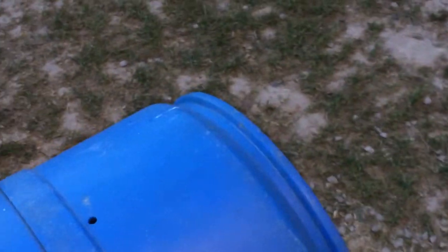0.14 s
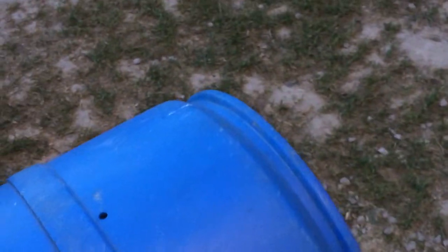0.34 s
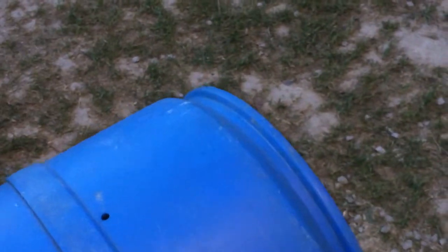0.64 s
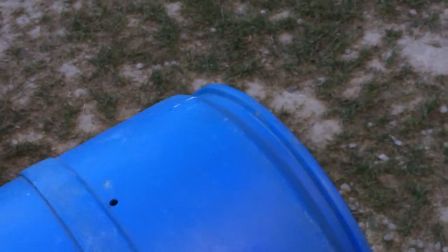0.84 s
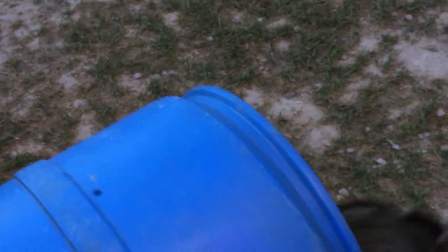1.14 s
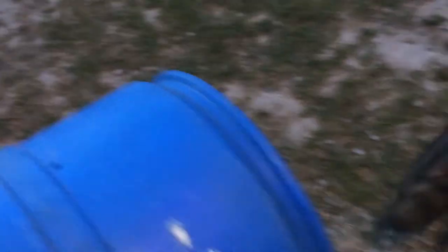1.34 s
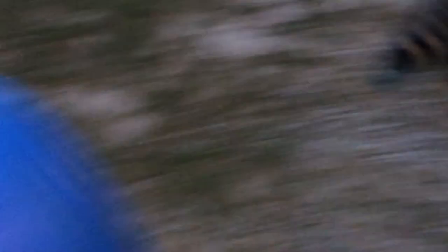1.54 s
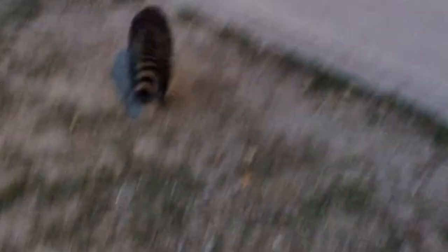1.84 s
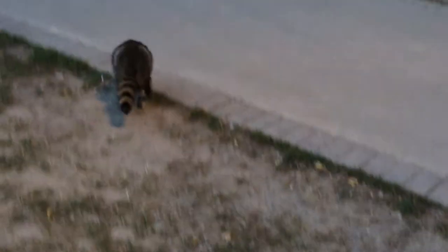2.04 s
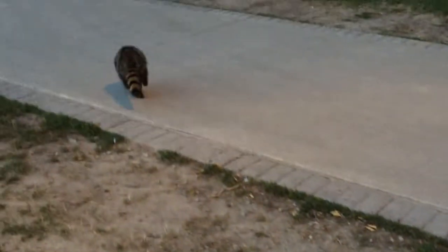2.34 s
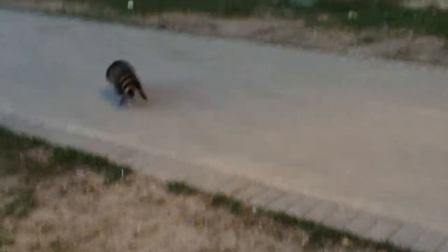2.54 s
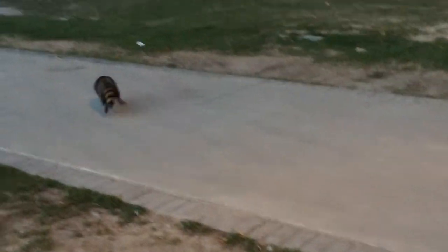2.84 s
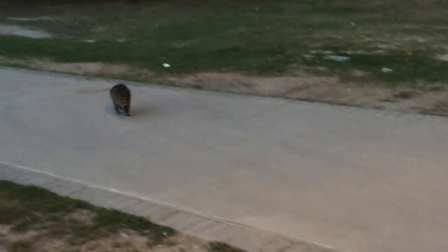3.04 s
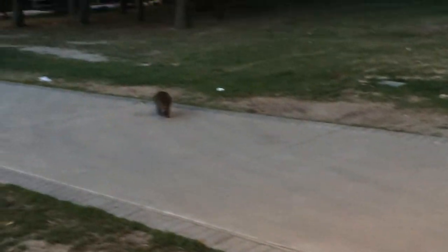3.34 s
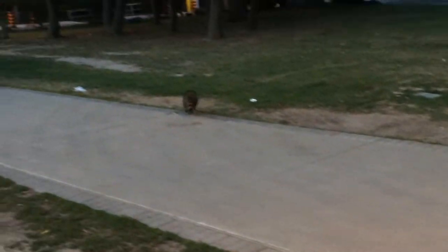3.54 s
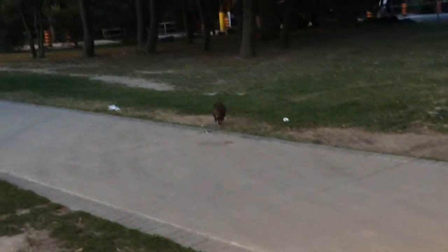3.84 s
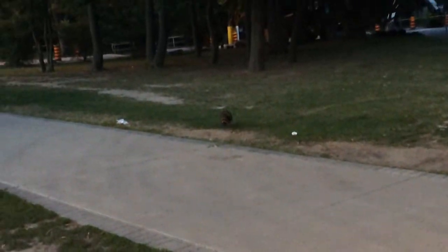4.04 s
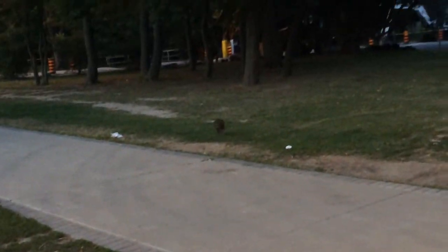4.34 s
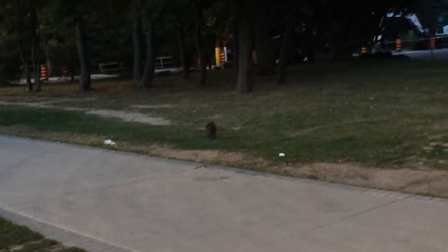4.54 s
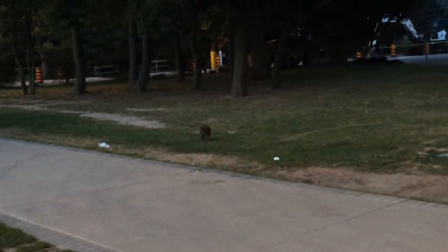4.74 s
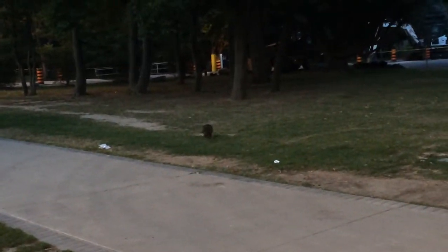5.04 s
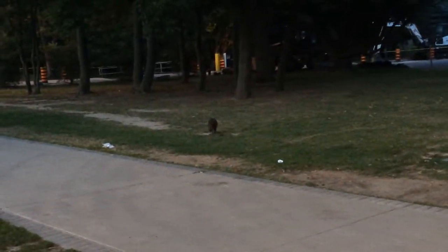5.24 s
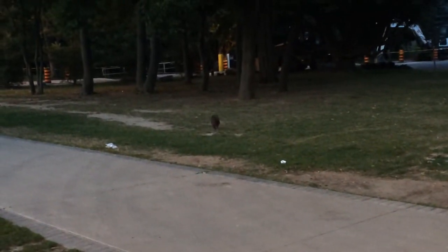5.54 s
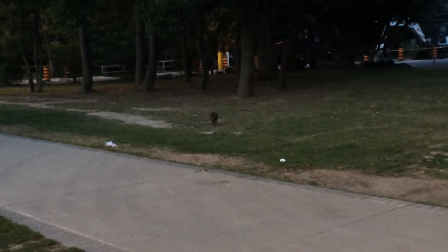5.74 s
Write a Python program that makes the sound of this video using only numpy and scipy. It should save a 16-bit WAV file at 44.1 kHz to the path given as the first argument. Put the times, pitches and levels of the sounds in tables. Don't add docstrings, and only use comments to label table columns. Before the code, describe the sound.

A boot thuds three times against an empty plastic drum; it rocks and scrapes dirt, claws scrabble out, and quiet traffic rumble remains.

```python
import sys
import numpy as np
from scipy import signal
from scipy.fft import rfft, irfft
from scipy.io import wavfile
from scipy.ndimage import uniform_filter1d

SR = 44100
rng = np.random.default_rng(int(sys.argv[2]) if len(sys.argv) > 2 else 0)


def boost_factor(decibels):
    exponent = np.asarray(decibels, float) / 20
    return 10 ** exponent


def generate_wav(sig):
    pcm = np.round(np.clip(np.atleast_2d(sig).T, -1, 1) * 32767).astype(np.int16)
    wavfile.write(sys.argv[1], SR, pcm)


N = 259749
T = np.arange(N) / SR

# frequency in Hz, level in dB per Hz.
CITY_SPECTRUM = [(12, -57), (20, -22.5), (37, -13), (66, -3.5), (95, -2), (130, -8), (181, -9), (221, -10),
                 (570, -23.5), (1320, -30), (3700, -47.5), (5470, -55.5), (6460, -54.5), (14500, -60.5),
                 (15800, -76)]
CITY_DB = -46.5
# frequency in Hz, width in Hz, level in dB.
ENGINE_TONE = (87.3, 34, -42)
# time in seconds, level of the second order in dB, of the fourth in dB.
ENGINE_OVERTONES = [(0, -64.5, -59.5), (2.5, -56.5, -59.5), (4, -52.5, -65.5), (5.89, -48.5, -62.5)]
SWISH_SPAN = (1.07, 3.92)
SWISH_DB, SWISH_FALL_DB_PER_S, SWISH_FADE_S = -67.5, 1.5, 0.17
# frequency in Hz, width in Hz, level in dB.
CRICKET_BANDS = [(5376, 830, -79)]
# start in seconds, length in seconds, level in dB.
TRILL_SWELLS = [
    (3.45, .2, -98),
    (5.1, .65, -95),
]
TRILL_REST_DB = -104
FIRST_CHIRP_S, CHIRP_EVERY_S, CHIRP_DB = 1.64, 0.508, -87.5
# start in seconds, peak in dB, centre in Hz, level of the dull body in dB.
PAW_STEPS = [(1.7963, -59, 7800, -14), (1.8352, -60, 8150, -11), (1.9909, -62, 8130, -11),
             (2.0228, -64, 8280, -11), (2.145, -61, 8280, -9), (2.168, -54.5, 12000, -16),
             (2.2064, -59, 7770, -10), (2.2648, -62, 7700, -7), (2.363, -58, 7920, -17),
             (2.432, -46.5, 9650, -21), (2.497, -53, 8800, 2), (2.5237, -60, 8210, -10),
             (2.5394, -62, 7880, -6), (2.6743, -63, 12800, -17), (2.6948, -63, 8160, -13),
             (2.764, -53, 14400, -16), (2.802, -58, 11000, -12), (2.8525, -56.5, 7800, -14),
             (2.9163, -68, 7750, -13), (2.9846, -66, 10400, -12), (3.0709, -67, 8820, -12),
             (3.0839, -60, 8870, -14), (3.1328, -59, 7860, 6), (3.1991, -63, 8910, -10),
             (3.2311, -59, 8400, -11), (3.2939, -64.5, 9790, -10), (3.3837, -59, 13300, -13),
             (3.5882, -60, 11900, -15), (3.7154, -56, 8720, -19), (3.7264, -53.5, 8470, -27)]
STEP_T60_S, STEP_RISE_S, STEP_DB = 0.028, 0.0024, -4.5
# start in seconds, peak in dB, centre in Hz, level of the dull body in dB.
TWIG_SNAPS = [(0.115, -62, 6740, -8), (0.3587, -52, 6090, 4), (.3714, -39, 8500, -8),
              (.404, -46, 8590, -11), (.414, -47, 12000, -9), (.422, -39.5, 7500, -9),
              (0.4274, -38, 7600, -11), (.4324, -44, 7500, -10), (.4374, -44, 7500, -10),
              (.6779, -70, 9030, -5), (0.754, -33, 13500, -4), (.7818, -53, 7000, -4),
              (.8014, -47, 5000, 0), (0.8875, -38, 8850, -10), (0.906, -52, 6380, -6),
              (1.019, -55, 7740, -10), (1.0625, -52, 6400, -8), (1.072, -44.5, 7800, -6),
              (1.084, -48, 7900, -7), (1.2088, -19.5, 7500, -4.5), (1.422, -53, 6440, 0),
              (1.4768, -49, 8100, -2), (1.5271, -51, 9000, 0), (1.5374, -43.5, 11100, 3),
              (1.543, -59, 6000, 6), (1.566, -56, 9290, 0), (1.576, -57, 11700, -5),
              (1.585, -54, 13800, -2.5), (1.597, -59, 11000, 3), (1.603, -60, 7900, 2)]
SNAP_T60_S, SNAP_LONGER_S_PER_DB, SNAP_RISE_S = 0.0096, -0.0929, 0.00015
# start in seconds, length in seconds, frequency in Hz, level in dB.
FLEX_CREAKS = [
    (1.166, .03, 425, -34),
    (1.232, .1, 458, -46),
    (1.96, .1, 860, -66),
]
# grit level in dB, its fall in dB per second, centre in Hz,
# wall level in dB, its fall in dB per second.
KICK_SKIDS = [
    (-45.5, 950, 5900, -30, 755),
    (-52.5, 126, 7800, -31, 750),
    (-61, 43, 8000, -32, 188),
]
SKID_S = 0.055
# start in seconds, length in seconds,
# grit level in dB, centre in Hz, level of the wall rubbing the soil in dB.
SOIL_DRAGS = [
    (0.401, 0.039, -55, 7900, -36),
    (0.448, .04, -69, 8300, -67),
    (.772, .053, -47.5, 6900, -40),
    (.83, 0.026, -61, 7200, -51),
    (1.066, 0.032, -63.5, 7350, -58),
    (1.204, 0.013, -45.5, 7450, -42),
    (1.245, 0.075, -62.5, 4400, -55),
    (1.42, 0.017, -76, 5600, -64),
    (1.464, 0.18, -77, 6500, -74),
]
GRIP_DB, GRIP_SHARE = -12, 0.29
STOP_S, STOP_DB, TRICKLE_S, TRICKLE_DB = 0.0065, -14.5, 0.078, -28
# frequency in Hz, level in dB per Hz.
GRIT_SPECTRUM = [(880, -28), (1500, 2), (4140, -10.5), (6070, -7), (7020, -11), (7520, -7.5), (10700, -13),
                 (15500, -15.5)]
# frequency in Hz, width in Hz, level in dB.
WALL_MODES = [(253, 16, 5), (339, 122, 7.5), (424, 237, 6), (782, 44, 0), (883, 37, 2.5), (1300, 316, -3),
              (1970, 260, -3.5), (1474, 100, -9), (2110, 200, -12.5), (2950, 490, -9), (4140, 620, -10.5),
              (5750, 2700, -17.5), (7640, 1100, -39)]
# start in seconds, level in dB.
ROCKING_THUMPS = [
    (0.778, -10),
    (.808, -17),
    (0.839, -23),
    (.878, -27),
    (0.916, -28),
    (1.417, -28.5),
    (1.488, -23.5),
    (1.549, -26.5),
]
# start in seconds, peak in dB, 60 dB decay in seconds,
# centre of the contact in Hz, spread in octaves (wide means hard).
WALL_BLOWS = [
    (.114, -38, 0.067, 3800, 0.99),
    (0.3603, -20, 0.096, 2400, 2.9),
    (0.7229, -17.5, 0.14, 1410, 1.5),
    (0.902, -24.5, .13, 1010, 0.85),
    (.981, -37.5, .06, 800, 0.72),
    (1.052, -39, 0.33, 690, 0.79),
    (1.107, -26.5, 0.12, 1030, 0.91),
    (1.1409, -21, 0.19, 370, 2.65),
    (1.422, -34, 0.12, 680, 2.1),
    (1.509, -29, 0.081, 780, 0.77),
]
SOFT_RISE_S = 0.0014
HARD_OCTAVES = 1.4
# kick in seconds, swell time in seconds, time in seconds when soil deadens the bin.
BIN_KICKS = [
    (.3591, .0087, .445),
    (.7196, .0014, .855),
    (1.1399, .0238, 1.221),
]
KICK_LEVELS = [8.5, 7.5, 7.5]
# frequency in Hz, level in dB, 60 dB decay in seconds.
DRUM_MODES = [
    [(65.3, -10.4, .3), (87.4, -1.9, .17), (111.6, -3.2, .08), (131, -27, .4), (169, -21, .22),
     (222, -21, .1)],
    [(65.6, -10, .3), (85.8, 4.6, .12), (97.7, 3.2, .08), (133.4, -27, .4), (164.5, -17, .22),
     (186.6, -12.4, .05), (265, -32, .1), (352, -25, .1), (44, -19, .2)],
    [(66.6, -1.1, .15), (87.3, 3, .15), (108.1, 3, .1), (128.3, -27, .4), (171.2, -6.5, .06),
     (207.8, -.8, .07)],
]


def evened(x):
    return x / np.sqrt(np.mean(x ** 2) + 1e-20)


def add(mix, s, sound):
    part = mix[round(s * SR):][:len(sound)]
    part += sound[:len(part)]


def noise(size=N):
    return rng.standard_normal(size)


def resonate(x, hz, width):
    turn = np.exp(2j * np.pi * np.cumsum(hz * np.ones(len(x))) / SR)
    r = np.exp(-np.pi * width / SR)
    smooth = signal.lfilter([1 - r], [1, -r], x / turn + 1e-18)
    return 2 * (turn * smooth).real


def coloured(x, points):
    hz, db = np.transpose(points)
    f = np.fft.rfftfreq(N, 1 / SR)
    return irfft(rfft(x) * boost_factor(np.interp(np.log(f + 1), np.log(hz + 1), db)), N)


def fuzzy(hz, width, size=N):
    return evened(resonate(resonate(noise(size), hz, width), hz, width))


def city_wash():
    return boost_factor(CITY_DB) * evened(coloured(noise(), CITY_SPECTRUM))


def engine_drone():
    hz, width, db = ENGINE_TONE
    turn = 2 * np.pi * np.cumsum(hz + 1.2 * fuzzy(3, 3)) / SR
    drone = boost_factor(db) * evened(.9 * fuzzy(hz, width) + np.cos(turn))
    s, second_db, fourth_db = np.transpose(ENGINE_OVERTONES)
    second = evened(fuzzy(2 * hz, 14.7) + np.cos(2 * turn))
    drone += boost_factor(np.interp(T, s, second_db)) * second
    drone += boost_factor(np.interp(T, s, fourth_db)) * fuzzy(363.7, 50)
    return drone


def insects():
    out = sum(boost_factor(db) * fuzzy(hz, width) for hz, width, db in CRICKET_BANDS)
    effort = boost_factor(TRILL_REST_DB)
    for s, length, db in TRILL_SWELLS:
        effort = effort + boost_factor(db) * np.clip(2 - abs(4 * (T - s) / length - 2), 0, 1)
    out += effort * fuzzy(8200, 120)
    t = T[:round(.17 * SR)]
    fade = signal.windows.tukey(len(t), .6)
    for s in np.arange(FIRST_CHIRP_S, N / SR, CHIRP_EVERY_S):
        throb = 1 + .3 * np.cos(2 * np.pi * (31 * t + rng.random()))
        tone = np.sin(2 * np.pi * np.cumsum(7270 + 900 * t) / SR)
        chirp = evened(tone + .9 * fuzzy(7300, 260, size=len(t)))
        add(out, s, boost_factor(CHIRP_DB + .8 * s) * chirp * throb * fade)
    return out


def grass_swish():
    clumps_db = 2.5 * evened(uniform_filter1d(noise(), size=900))
    rustle = boost_factor(clumps_db) * noise()
    rustle = evened(coloured(rustle, [(3000, -4.0), (7000, 3.0), (12000, -6), (15800, -3)]))
    start, end = SWISH_SPAN
    near = np.clip(np.minimum(T - start, end - T) / SWISH_FADE_S + .5, 0, 1)
    strides_db = 1.5 * fuzzy(2.2, 2.5) - SWISH_FALL_DB_PER_S * (T - start)
    return boost_factor(SWISH_DB + strides_db - 9.5) * near * rustle


def snap(db, hz, t60, rise, body_db):
    t = T[:SR // 10]
    burst = noise(len(t)) * boost_factor(-60 * t / max(t60, .004)) * (1 - np.exp(-t / max(rise, 1e-4)))
    steep = signal.butter(2, 4200, "high", fs=SR)
    bright = signal.lfilter(*steep, .17 * burst + resonate(burst, min(hz, 15000), 3200))
    body = resonate(resonate(burst, 5000, 4900), 5000, 4900)
    return boost_factor(db + 7.5) * (bright + boost_factor(body_db) * body)


def trot():
    out = np.zeros(N)
    for s, db, hz, body_db in PAW_STEPS:
        step = snap(db + STEP_DB, hz, STEP_T60_S, STEP_RISE_S, min(body_db, 6))
        add(out, s - STEP_RISE_S, step)
    return out


def twigs_and_claws():
    out = np.zeros(N)
    for s, db, hz, body_db in TWIG_SNAPS:
        t60 = SNAP_T60_S + SNAP_LONGER_S_PER_DB * max(db + 47, 0)
        add(out, s, snap(db, hz, t60, SNAP_RISE_S, body_db))
    return out


def creaks():
    out = np.zeros(N)
    for s, length, hz, db in FLEX_CREAKS:
        size = round(length * SR)
        wobbling_hz = hz + 2.2 * fuzzy(20, 15, size=size)
        tone = np.sin(2 * np.pi * np.cumsum(wobbling_hz) / SR)
        add(out, s, boost_factor(db) * tone * signal.windows.tukey(size, .4))
    return out


def strokes():
    t = np.arange(0, SKID_S, 1 / SR)
    for (s, *_), (db, fall, hz, rub_db, rub_fall) in zip(BIN_KICKS, KICK_SKIDS):
        yield s, db - fall * t, hz, rub_db - rub_fall * t
    for s, length, db, hz, rub_db in SOIL_DRAGS:
        corners = [0, GRIP_SHARE * length, length, length + STOP_S, length + TRICKLE_S]
        t = np.arange(0, corners[-1], 1 / SR)
        shape_db = np.interp(t, corners, [GRIP_DB, 0, 0, STOP_DB, TRICKLE_DB])
        yield s, db + shape_db, hz, rub_db + 1.27 * shape_db


def scrape():
    spread = np.minimum(uniform_filter1d(rng.exponential(1, N), size=3), 4)
    spread += evened(uniform_filter1d(noise(), size=120))
    grains = noise() * boost_factor(2.4 * spread)
    wall = np.zeros(N)
    for k, (hz, width, _) in enumerate(WALL_MODES[2:6]):
        wall += (-1) ** k * resonate(grains, hz, 2 * width)
    wall = evened(wall)
    grit, rub = np.zeros(N), np.zeros(N)
    for s, db, hz, rub_db in strokes():
        at = slice(round(s * SR), round(s * SR) + len(db))
        fade = signal.windows.tukey(len(db), .08)
        part = evened(.5 * grains[at] + resonate(grains[at], hz, 2600))
        add(grit, s, boost_factor(db + 14) * part * fade)
        add(rub, s, boost_factor(rub_db - 1.5) * wall[at] * fade)
    return coloured(grit, GRIT_SPECTRUM) + rub


def thumps():
    t, out = T[:SR // 10], np.zeros(N)
    push = np.sin(2 * np.pi * 84 * t) * (t / 0.015) * np.exp(1 - t / 0.0096)
    for s, db in ROCKING_THUMPS:
        add(out, s, boost_factor(db) * push)
    return out


def blows():
    t, out = T[:SR // 4], np.zeros(N)
    for s, db, t60, centre, spread in WALL_BLOWS:
        rattle = noise(len(t))
        if spread > HARD_OCTAVES:
            rattle += 5 * np.exp(-t / .0002)
        sound = np.zeros(len(t))
        for k, (hz, width, mode_db) in enumerate(WALL_MODES):
            dying = boost_factor(-60 * t / (max(t60, .01) * (1000 / hz) ** 0.88))
            reach_db = -6 * (np.log2(hz / centre) / spread) ** 2
            sound += (-1) ** k * boost_factor(mode_db + reach_db) * resonate(rattle * dying, hz, width)
        rise = 1 - np.exp(-t * spread ** 0.92 / SOFT_RISE_S)
        add(out, s, boost_factor(db + 7.0) * sound * rise)
    return out


def booms():
    t, out = T[:SR // 2], np.zeros(N)
    for (s, swell, dead), modes, kick_db in zip(BIN_KICKS, DRUM_MODES, KICK_LEVELS):
        ring = np.zeros(len(t))
        for k, (hz, db, t60) in enumerate(modes):
            ring += (-1) ** k * boost_factor(db - 60 * t / t60) * np.cos(2 * np.pi * hz * t)
        damped = boost_factor(kick_db - 450 * np.maximum(t + s - dead, 0))
        add(out, s, ring * damped * (1 - np.exp(-(t / swell) ** 2)))
    return out


def scene():
    background = city_wash() + engine_drone() + insects()
    animal = grass_swish() + trot() + twigs_and_claws()
    kicked_bin = creaks() + scrape() + thumps() + blows() + booms()
    return (background + animal + kicked_bin)[None]


def band_limit(x):
    return signal.sosfilt(signal.butter(12, 15940, fs=SR, output="sos"), x)


def record(dry):
    power_db = 10 * np.log10(abs(uniform_filter1d(dry[0] ** 2, size=1200)) + 1e-12)
    fall = T * 48.6
    held_db = np.maximum.accumulate(power_db + fall) - fall
    over_db = np.maximum(held_db + 26.0, 0)
    ducked = dry / boost_factor(0.3 * uniform_filter1d(over_db, size=300))
    ducked /= (1 + ducked ** 6 / .2) ** (1 / 6)
    edge = signal.firwin(511, 15560, window=("kaiser", 9), fs=SR)
    return band_limit(signal.oaconvolve(ducked, edge[None], "same"))


dry = scene()
out = record(dry)
generate_wav(out)
```